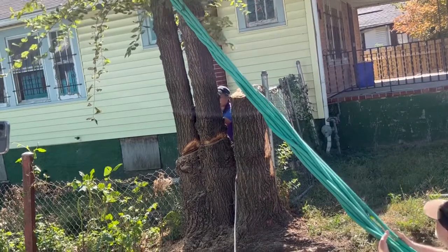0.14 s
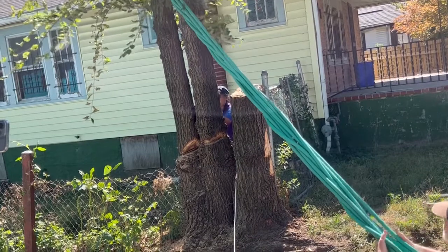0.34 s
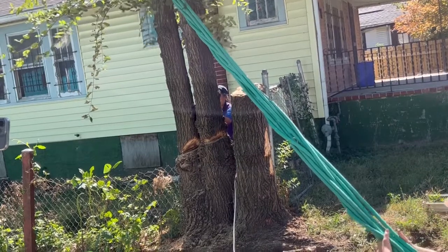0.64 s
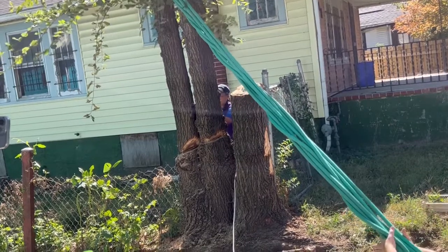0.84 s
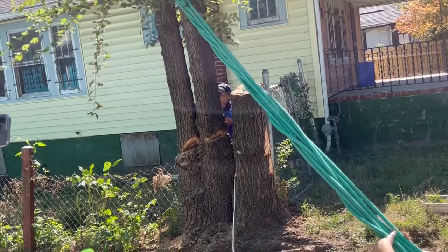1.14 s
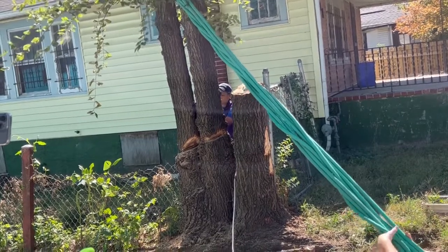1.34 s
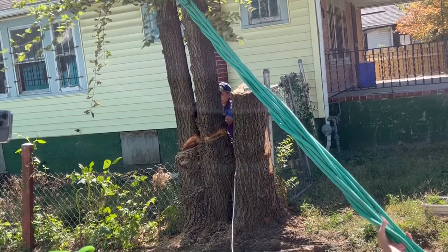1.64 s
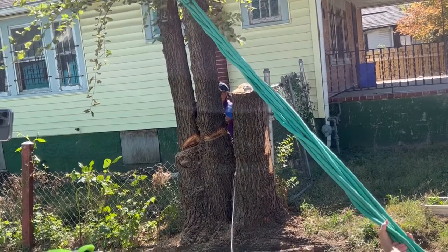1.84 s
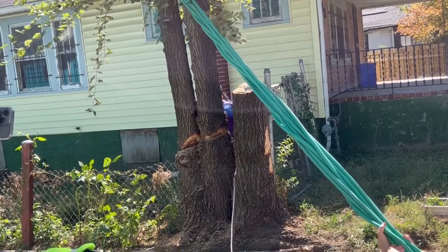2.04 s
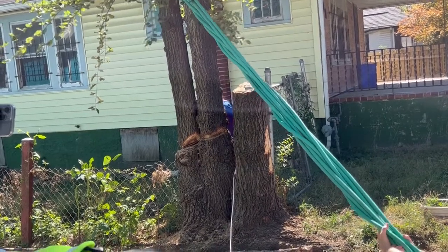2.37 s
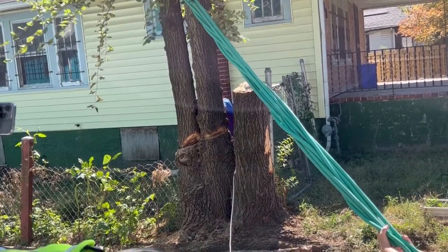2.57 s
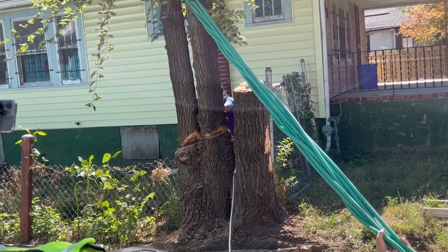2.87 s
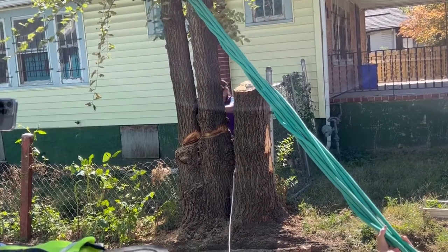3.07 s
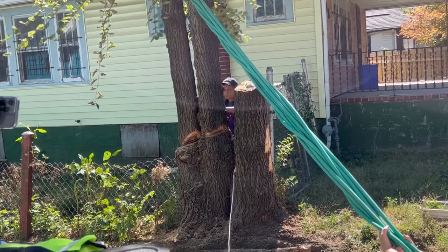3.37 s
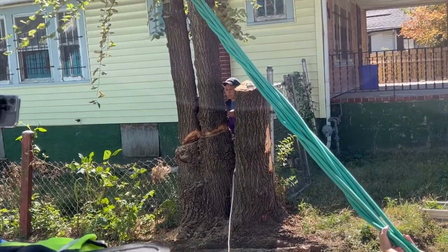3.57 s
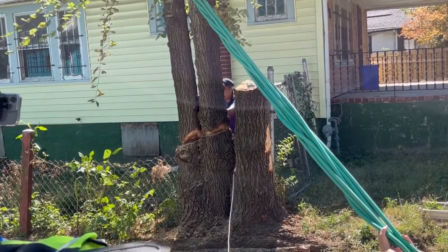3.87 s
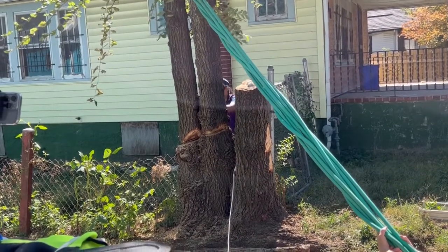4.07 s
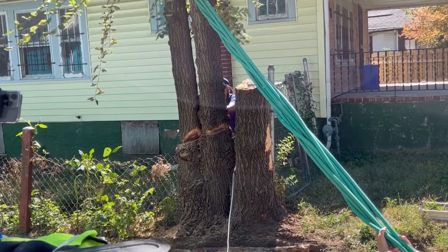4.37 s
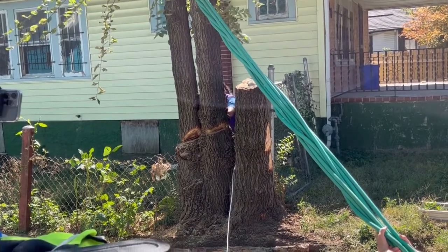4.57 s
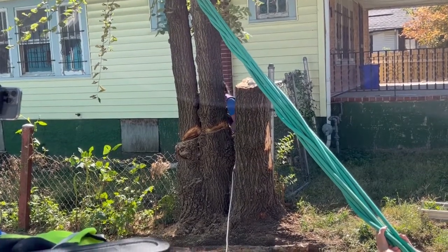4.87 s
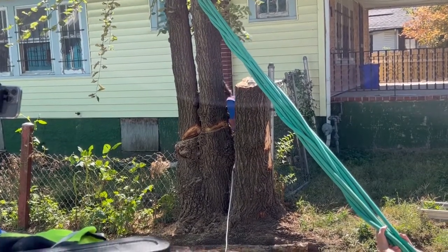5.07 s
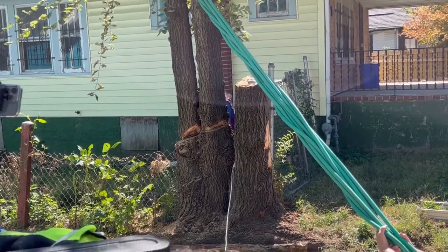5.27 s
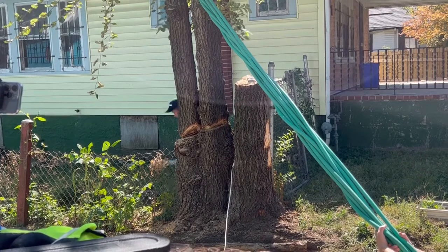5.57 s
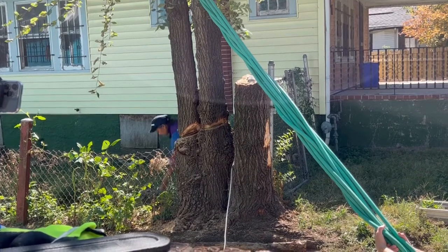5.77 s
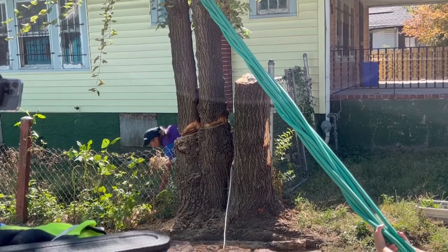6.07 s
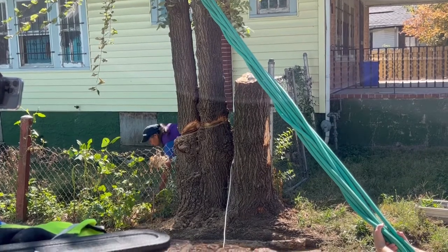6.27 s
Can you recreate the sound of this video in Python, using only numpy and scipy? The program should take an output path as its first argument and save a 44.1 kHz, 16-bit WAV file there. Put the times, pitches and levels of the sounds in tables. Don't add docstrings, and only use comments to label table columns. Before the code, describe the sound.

Outdoors, a tree trunk is struck twice sharply and then tapped more gently, amid dry leaves rustling, insects trilling and a distant motor.

```python
import sys
import numpy as np
from scipy import signal
from scipy.fft import rfft, irfft, next_fast_len
from scipy.io import wavfile
from scipy.ndimage import uniform_filter1d

SR = 44100
rng = np.random.default_rng(int(sys.argv[2]) if len(sys.argv) > 2 else 0)


def rack_gain(trim_db):
    fader = np.asarray(trim_db, float)
    return 10 ** (fader / 20)


def generate_wav(signal):
    frames = np.transpose(np.atleast_2d(signal))
    scaled = np.clip(frames, -1, 1) * 32767
    pcm = np.round(scaled).astype(np.int16)
    wavfile.write(sys.argv[1], SR, pcm)


N = 283122
T = np.arange(N) / SR


def unit(x):
    return x / np.sqrt(np.mean(x ** 2))


def colour(x, points):
    hz, db = np.transpose(points)
    size = next_fast_len(x.shape[-1])
    f = np.maximum(np.arange(size // 2 + 1) * SR / size, 1)
    gain = rack_gain(np.interp(np.log(f), np.log(hz), db))
    return irfft(rfft(x, size) * gain, size)[..., :x.shape[-1]]


def band(x, lo_hz, hi_hz):
    sos = signal.butter(2, [lo_hz, min(hi_hz, .45 * SR)], "band", fs=SR, output="sos")
    return signal.sosfilt(sos, x)


def noise(size):
    return rng.standard_normal((2, size))


def sine(hz):
    return np.sin(2 * np.pi * np.cumsum(hz) / SR)


def walk(rate, size=N):
    hold = int(SR / rate)
    steps = np.repeat(rng.standard_normal(size // hold + 1), hold)
    return 1.2 * uniform_filter1d(uniform_filter1d(steps, hold), hold)[:size]


def mid_side(share):
    return np.array([[1], [share]])


def add(out, x, s):
    i = int(s * SR)
    out[:, i:i + x.shape[-1]] += x[..., :N - i]


# start_s, peak_db, crack_db, trunk_ring_db, yard_db
BLOWS = [
    (.5024, -1, -11, -2, -12.7),
    (1.2762, -1, -18, -7, -13.3),
    (2.7198, -37, -25, -12, 1),
    (3.2297, -21.5, -16, -11, -14),
    (4.0698, -17.5, -16, -9, -13.5),
    (4.6845, -35.5, -14, -16, -9.5),
]
# pitch_hz, width_hz, level_db
SPOTS = [
    [(930.6, 210, 0.5), (1495, 210, -4.5), (2348, 350, -4.5), (3650, 460, -14.5)],
    [(991, 190, 3), (1450, 240, 1.5), (2470, 200, -12), (3620, 690, -21)],
    [(226, 77, 0), (400, 130, -7), (887, 200, -6), (1500, 260, -15)],
    [(343, 120, 2), (581, 204, -0.5), (1096, 290, -4), (1465, 380, -6.5), (2770, 520, -17),
     (4300, 410, -14.5)],
    [(417.5, 90, 1), (773, 150, -3), (1080, 185, 0), (1589, 510, -10), (2660, 550, -11), (4080, 260, -27)],
    [(446, 120, 6.5), (984, 300, -3), (1862, 260, -18.5), (4230, 680, -17)],
]
# pitch_hz, level_db (per Hz)
TAILS = [
    [(80, -31.5), (155, -9), (300, -22), (450, -20), (590, -1), (750, -5), (950, 1), (1200, -12),
     (1500, -3.5), (1900, -16), (2400, -7), (2900, -17), (3800, -11), (5300, -24), (7200, -26), (9000, -34),
     (16000, -38)],
    [(80, -31.5), (155, 1), (230, -6), (300, -12), (400, -5), (590, -9), (780, -7.5), (1000, -3),
     (1450, -0.5), (1900, -9.5), (2500, -15), (3000, -13.5), (3600, -14), (5500, -29), (7000, -31),
     (16000, -38)],
    [(90, -23), (150, 3), (230, 0), (470, -12), (900, -19), (2500, -40), (16000, -70)],
    [(90, -26.5), (150, 5), (340, -2), (590, 1), (1100, -1), (1600, -28), (3000, -32), (16000, -52)],
    [(90, -30.5), (160, -10), (430, -5), (750, -1), (1080, 1.5), (1800, -7), (4000, -19.5), (16000, -42)],
    [(120, -23), (420, -6.5), (900, -10), (2800, -19.5), (4300, -13), (8000, -24), (16000, -29.5)],
]
# pitch_hz, level_db, t60_s
WEDGE = [
    [(2369, -36, .3), (3015, -34, .16), (3817, -24, .085), (4920, -37, .15), (5534, -43, .19),
     (6476, -40, .15), (7041, -30, .075), (7246, -34, .12), (8156, -40, .1)],
    [(2589, -36, .22), (3009, -37, .17), (3144, -38, .25), (3752, -34, .2), (4409, -34, .12),
     (6837, -50, .3)],
    [],
    [],
    [],
    [],
]


def blows():
    out, t = np.zeros((2, N)), T[:32768]
    for (s, db, crack_db, ring_db, yard_db), spot, tail, wedge in zip(BLOWS, SPOTS, TAILS, WEDGE):
        knock = struck_spot(spot, t)
        knock = knock / np.abs(knock).max() + rack_gain(crack_db) * bark_crack(t)
        ring = rack_gain(ring_db - 11.5) * trunk_ring(t) + wedge_ring(wedge, t)
        direct = knock + ring + wall_echoes(knock)
        direct = direct * mid_side(.31 + .0055 * db)
        add(out, rack_gain(db) * (direct + rack_gain(yard_db + 1.5) * yard_answer(tail, t)), s - .0008)
    return out


def struck_spot(spot, t):
    knock = 0
    for hz, width, db in spot:
        u = t * width * 4.9
        swell = u ** 2 * np.exp(-(u / 3) ** 2)
        knock = knock + rack_gain(db) * width / 250 * swell * np.sin(2 * np.pi * hz * t)
    return knock


# pitch_hz, level_db (per Hz)
CRACK = [(1500, -41.5), (2300, -21.5), (3000, -2), (4500, -7), (7300, -17.5), (10000, -26.5),
         (12900, -23.5), (15800, -36)]


def bark_crack(t):
    return unit(colour(rng.standard_normal(len(t)), CRACK)) * np.exp(-t / .002) * (1 - np.exp(-t / .0004))


# pitch_hz, level_db, t60_s
TRUNK = [(155, -7, 0.15), (227, -4, 0.1), (592.5, 2.5, 0.089), (1020, -7, 0.11), (1217, -15.5, 0.17),
         (1475, 4.5, 0.052), (1444, -15, 0.22), (2589, -20.5, 0.23), (3219, -17.5, 0.23), (3752, -25, 0.22)]


def trunk_ring(t):
    ring = 0
    for hz, db, t60 in TRUNK:
        ring = ring + rack_gain(db) * 1000 ** (-t / t60) * np.sin(2 * np.pi * (hz * t + rng.random()))
    return ring * (1 - np.exp(-(t / .008) ** 2))


def wedge_ring(wedge, t):
    ring = 0
    for hz, db, t60 in wedge:
        fade = 1000 ** (-t / t60) * (1 - np.exp(-t / .003))
        ring = ring + rack_gain(db + 3.5 * walk(90, len(t))) * fade * np.sin(2 * np.pi * hz * t)
    return ring


# delay_s, level_db
ECHOES = [(.009, -14), (0.0194, -9.5), (.0228, -16), (.046, -19), (.081, -32)]


def wall_echoes(knock):
    dull = .2 * knock + band(knock, 100, 1700)
    return sum(rack_gain(db) * np.roll(dull, int(delay * SR)) for delay, db in ECHOES)


def yard_answer(tail, t):
    scatter = colour(yard(t), tail) * rack_gain(1.5 * walk(160, len(t)))
    edges = np.clip(t / .002, 0, 1) * np.clip(7 - 10 * t, 0, 1)
    return scatter * edges / (3.2 * scatter[0, :SR // 20].std())


# pitch_hz, level_db, near_t60_s, far_level_db, far_t60_s
YARD = [(180, 3, 0.29, -26, .5), (400, 5.5, 0.19, -27.5, .5), (900, -7.5, 0.24, -14, 1),
        (1675, -3.5, .2, -13.5, .6), (3600, -0.5, 0.15, -15, .7), (7400, 0.5, .2, -8, .5),
        (13000, -1.5, .15, -33, .4)]


def yard(t):
    out = 0
    for hz, db, near_t60, far_db, far_t60 in YARD:
        fade = 1000 ** (-t / near_t60) + rack_gain(far_db) * 1000 ** (-t / far_t60)
        fade *= 1 - np.exp(-t * np.sqrt(hz) / 0.13)
        out = out + rack_gain(db) * fade * band(noise(len(t)), hz / 1.6, hz * 1.45)
    return out


# loudest_at_s, level_db, swell_s (for 10 dB), die_s (for 10 dB), bright_swish_db
STIRS = [(0, -62, .01, .02, -8), (.254, -64.5, .13, .06, -1), (.49, -62, .09, .65, -3),
         (.831, -56, .005, .09, -24), (1.11, -55.5, .147, .06, -6), (1.26, -60.5, .14, .27, -4),
         (1.8, -60.5, .16, .16, 1), (1.958, -58.5, .04, .072, -12), (2.334, -63, .045, .13, -17),
         (2.506, -56.5, .028, .15, -4), (2.578, -60, .06, .06, 5), (2.828, -49.5, .035, .3, -7),
         (2.89, -47, .06, .3, -8), (2.96, -45, .07, .06, -8), (3.02, -48, .06, .06, -8),
         (3.125, -52, .04, .1, -1), (3.228, -46, .012, .047, -4), (3.398, -50, .17, .062, -4.5),
         (3.582, -63.5, .3, .021, -25), (3.754, -64.5, .085, .07, -8), (4.34, -66.5, .03, .147, -8),
         (4.686, -58, .007, .05, -8), (4.9, -68, .3, .22, -18)]


def rustle():
    body_db, bright_db = -79, -83
    for s, db, swell_s, die_s, more_db in STIRS:
        stir_db = db - 10 * np.maximum((s - T) / swell_s, (T - s) / die_s)
        body_db = np.maximum(body_db, stir_db)
        bright_db = np.maximum(bright_db, stir_db + more_db)
    low = unit(band(leaves(), 600, 1900))
    middle = unit(band(leaves(), 1900, 7600))
    bright = unit(band(leaves(), 4700, 19000))
    swish = rack_gain(body_db) * (middle + rack_gain(-2.5) * low) + rack_gain(bright_db - .3) * bright
    return rack_gain(1.3 * walk(60)) * swish


# pitch_hz, level_db (per Hz)
LEAVES = [(300, -9.5), (580, -11), (1300, -7.5), (2430, -4.5), (5000, -9), (8400, -8.5), (12300, -10.5),
          (15800, -26.5)]


def leaves():
    size = np.minimum(rng.exponential(size=(2, N)), 4)
    hits = rng.random((2, N)) < 3500 / SR
    grains = hits * rack_gain(2.5 * size) * noise(N)
    return colour(.6 * unit(grains) + noise(N), LEAVES)


# start_s, peak_db, pitch_hz, t60_s
SNAPS = [(0.8315, -35, 2500, 0.088), (1.0016, -43.5, 1760, 0.041), (1.055, -47, 2390, 0.068),
         (1.0994, -41.5, 2470, 0.041), (1.2082, -50, 2470, 0.042), (1.6716, -47, 7480, 0.058),
         (1.7689, -43, 2900, 0.06), (1.9485, -43, 2300, 0.091), (1.9824, -47.5, 6660, 0.071),
         (2.3221, -46, 4410, 0.054), (2.4902, -41.5, 2370, 0.082), (2.5092, -37, 6430, 0.06),
         (2.5651, -32, 7000, 0.025), (3.0664, -39.5, 2470, 0.06), (3.3648, -36.5, 2006, 0.069),
         (3.5738, -48.5, 7400, 0.089), (3.7494, -47, 7390, 0.058), (4.338, -49, 7400, 0.06),
         (4.9094, -52, 7420, 0.06)]


def snaps():
    out, t = np.zeros((2, N)), np.arange(SR // 4) / SR
    for s, db, hz, t60 in SNAPS:
        fade = 1000 ** (-t / t60) + 1.5 * np.exp(-t / 0.0018)
        burst = noise(len(t)) * fade * (1 - np.exp(-t / 0.0011))
        snap = band(burst, hz / 1.5, hz * 1.4) + 0.24 * band(burst, 1500, 13000)
        add(out, rack_gain(db) * snap / np.abs(snap[0]).max(), s)
    return out


# start_s, peak_db, pitch_hz, t60_s
TICKS = [(1.2127, -50, 12000, .02), (1.372, -48, 9000, .015), (1.3942, -40, 4000, .01),
         (1.3944, -43, 7500, .008), (1.3946, -52, 12500, .008), (1.405, -58, 12000, .012),
         (1.267, -38, 1200, .05), (2.8217, -43, 1570, .03), (2.858, -42, 1900, .03),
         (2.924, -40, 1300, .03), (2.938, -39, 2800, .04), (2.954, -34.5, 2250, .05),
         (2.963, -37, 1350, .03), (3.008, -40, 2900, .03), (3.075, -42, 1700, .03), (3.117, -42, 2610, .03),
         (4.6973, -35, 4900, .012), (4.7003, -39, 4150, .02), (4.7065, -48, 6300, .015),
         (4.718, -48, 4300, .015), (4.7025, -45, 900, .02)]


def ticks():
    out, t = np.zeros((2, N)), T[:4096]
    for s, db, hz, t60 in TICKS:
        burst = noise(len(t)) * 1000 ** (-t / t60) * (1 - np.exp(-t / .0004))
        click = band(burst * np.exp(-t / .001), 2000, 15000)
        tick = band(burst, hz / 1.2, hz * 1.2) + .06 * click
        add(out, rack_gain(db) * tick / np.abs(tick[0]).max(), s)
    return out


# pitch_hz, width_hz, level_db
WING = [(11600, 400, -3), (13050, 300, 2), (13750, 400, -4), (14450, 500, -1), (13500, 4400, 1.5)]


def katydid():
    teeth = noise(N) * (1 + .3 * sine(170 + 30 * walk(20)))
    wing = unit(sum(rack_gain(db) * band(teeth, hz - w / 2, hz + w / 2) for hz, w, db in WING))
    return (wing_strokes() + wing_buzz()) * wing * mid_side(.6)


def wing_strokes():
    strokes, t = np.zeros((1, N)), np.arange(SR // 8) / SR
    shape = (1 - np.exp(-t / .004)) * np.exp(-t / .024)
    after_s = np.cumsum([0] + 19 * [.0714] + 9 * [.0803])
    for late in after_s:
        db = -53.5 - 12 * np.exp(-late / .2) + 1.2 * rng.standard_normal()
        add(strokes, rack_gain(db - 4) * shape, 3.6007 + late - .003)
    return strokes


# start_s, end_s, start_level_db, end_level_db
BUZZ = [
    (-.1, .715, -66, -68.5),
    (5.745, 6.05, -70, -66),
]


def wing_buzz():
    buzz = rack_gain(-84)
    for start, end, from_db, to_db in BUZZ:
        gate = np.clip(np.minimum(T - start, end - T) / .04 + .5, 0, 1)
        buzz = buzz + rack_gain(np.interp(T, [start, end], [from_db, to_db])) * gate
    return buzz * (1 + 0.24 * np.sin(2 * np.pi * 28 * T))


# pitch_hz, level_db, pulses_per_s, chirps_per_s, share_of_time_singing, first_chirp_s, side_share
CRICKETS = [
    (7330, -74.5, 18, .5, 0.88, 0, .1),
    (7150, -80.5, 15, .5, 1.0, 0, .1),
    (6600, -77, 45, 2.5, .3, 0.28, .1),
    (6700, -76.5, 30, 4.3, .2, .08, .5),
    (8000, -89.5, 25, .7, 1, 0, .5),
    (9300, -74, 40, 4.1, 0.62, 0.103, 2.5),
]
# start_s, length_s, pitch_hz, level_db, pulses_per_s
CHIRPS = [(5.054, 0.165, 3290, -72, 41.5), (5.33, 0.16, 3170, -75, 31), (5.565, .11, 3310, -71, 40),
          (6.035, 0.135, 3290, -72, 40), (6.258, .14, 4550, -78, 14), (5.25, .07, 4750, -82, 30),
          (5.37, .17, 4410, -82, 10.98)]


def crickets():
    out = np.zeros((2, N))
    for hz, db, rate, repeat, share, start, side in CRICKETS:
        singing = uniform_filter1d(1. * ((T - start) * repeat % 1 < share), size=800)
        song = singing * pulsed(hz, rate, T, fall_hz=60, depth=0.5)
        out += rack_gain(db + 4.5 + 1.5 * walk(3)) * song * mid_side(side)
    for s, length, hz, db, rate in CHIRPS:
        t = T[:int(length * SR)]
        chirp = np.sin(np.pi * t / length) ** 0.3 * pulsed(hz, rate, t, fall_hz=300, depth=0.73)
        add(out, rack_gain(db + 5.5 + 1.5 * walk(30, len(t))) * chirp * mid_side(.3), s)
    return out


def pulsed(hz, rate, t, fall_hz, depth):
    beat = rate * t + .015 * walk(6, len(t))
    gate = 1 - depth + depth * np.sin(np.pi * beat) ** 4
    pitch = hz + fall_hz * (.5 - beat % 1 + .3 * walk(400, len(t)))
    return gate * rack_gain(2.3 * walk(150, len(t))) * sine(pitch)


# time_s, level_db
HUM = [(0, -41), (.55, -37.5), (.95, -49), (1.21, -51.5), (1.27, -68), (1.3, -42), (1.41, -58), (1.62, -56),
       (2.19, -46), (2.24, -52), (2.81, -47.5), (3.2, -51), (3.65, -48), (3.97, -55.5), (4.24, -42.5),
       (4.74, -40), (5.2, -49), (6.3, -46)]
# multiple, level_db, swell_db, swell_period_s, loudest_at_s
OVERTONES = [(2, -64, .5, 3, 0), (3, -67, 6, 3.15, 0), (4, -69, 7, 1.8, 1.1), (5, -73, 6, 2.8, .55),
             (6, -83, .5, 3, 0), (7, -83.5, .5, 3, 0)]


def hum():
    turn = 2 * np.pi * np.cumsum(83.8 + .3 * walk(6)) / SR
    tone = rack_gain(np.interp(T, *np.transpose(HUM)) + .8 * walk(12)) * np.sin(turn)
    upper = 0
    for k, db, swell_db, period, s in OVERTONES:
        level_db = db + swell_db * np.cos(2 * np.pi * (T - s) / period) + 1.4 * walk(11)
        upper = upper + rack_gain(level_db) * np.sin(round(k) * turn + k)
    throb = 1 + 1.1 * sine(12 + 4.5 * walk(2))
    knock = rack_gain(-62 + .85 * T) * throb * sine(161.7 + 5 * walk(4.7))
    return np.sqrt(2) * (tone * mid_side(.03) + upper * mid_side(.05)) + knock * mid_side(-.3)


# pitch_hz, level_db (per Hz)
AIR = [(16, -43), (28, -9), (59, -0.5), (85, -3), (130, -12), (174, -10.5), (210, -18), (260, -18),
       (700, -26), (1530, -37), (4930, -50), (7340, -37), (9000, -41), (15800, -53)]


def air():
    low = rack_gain(.8 * walk(1.5)) * band(colour(noise(N), AIR), 20, 700)
    high = rack_gain(.5 * walk(1.5)) * band(colour(noise(N), AIR), 700, 18000)
    return rack_gain(-50.5) * unit(low + high)


# pitch_hz, level_db
PAIR = [(20, -0.5), (8700, -0.5), (9300, -11.5), (9700, -39.5), (10400, -39), (10900, -12.5), (11300, 0),
        (20000, 3)]
# pitch_hz, side_minus_mid_db
WIDTH = [(25, -36), (110, -14), (380, -14), (700, -1), (1290, -5), (1800, -25), (3200, -16), (6000, -27),
         (7800, -15), (8600, -4.5), (11800, -.8), (12600, -14), (13500, -26), (15000, -3)]
# pitch_hz, signed_share
TURN = [(1900, 0), (2700, .14), (3700, .27), (5100, .1), (6000, 0), (6800, 0), (7500, -.1), (8200, -.45),
        (8900, -1.1), (9600, -1.6), (10600, 1.5), (11700, .75), (12400, .4), (13400, 0), (14400, -.4),
        (15500, -1.1)]


def scene():
    mid, side = blows() + rustle() + snaps() + ticks() + katydid() + crickets() + hum() + air()
    mid = colour(mid, PAIR)
    size = next_fast_len(N)
    share = np.interp(np.arange(size // 2 + 1) * SR / size, *np.transpose(TURN))
    quarter_turn = irfft(1j * share * rfft(mid, size), size)[:N]
    side = colour(side, WIDTH) + quarter_turn
    return np.array([mid + side, mid - side])


def band_limit(x):
    return signal.sosfilt(signal.butter(12, 15980, fs=SR, output="sos"), x)


# pitch_hz, level_db
PORT = [(20, -14), (40, -1.5), (15600, 0), (15900, -62)]


def record(dry):
    rounded = np.tanh(0.59 * dry) / .6
    mix = colour(rounded, PORT)
    return band_limit(mix)


dry = scene()
out = record(dry)
generate_wav(out)
```